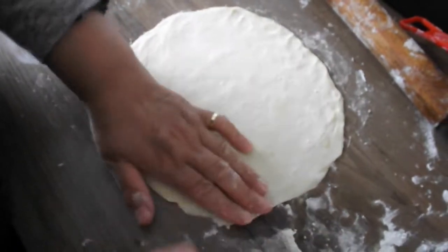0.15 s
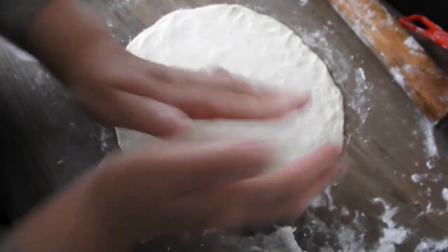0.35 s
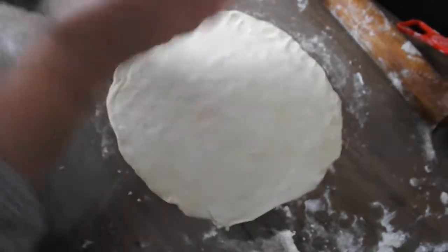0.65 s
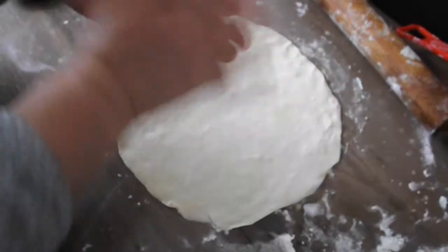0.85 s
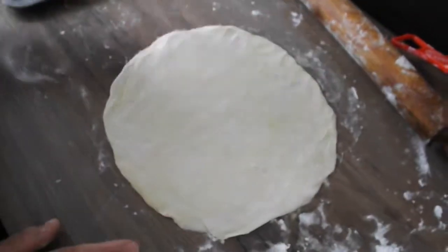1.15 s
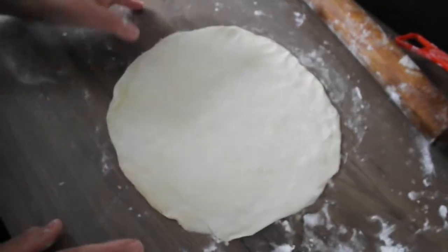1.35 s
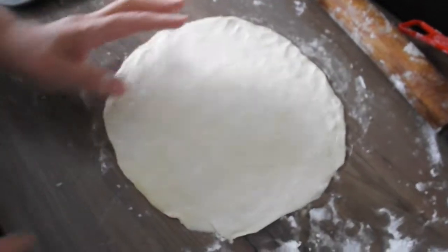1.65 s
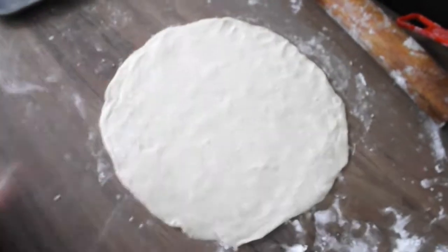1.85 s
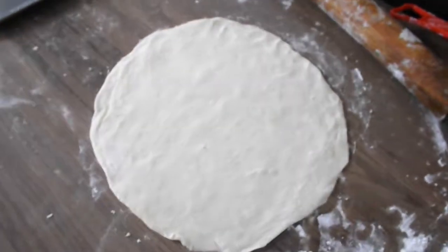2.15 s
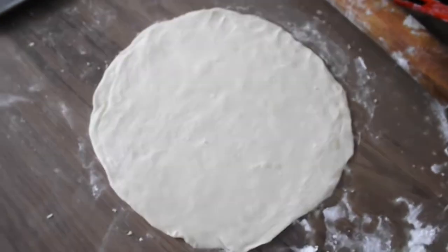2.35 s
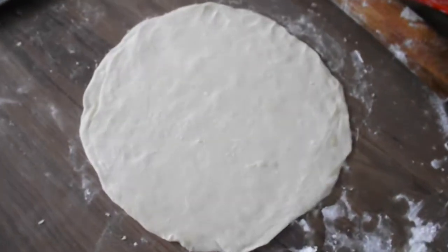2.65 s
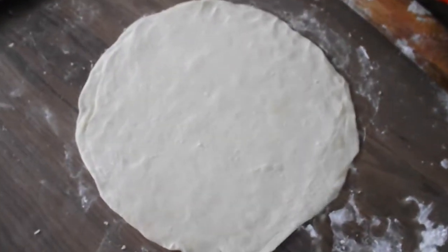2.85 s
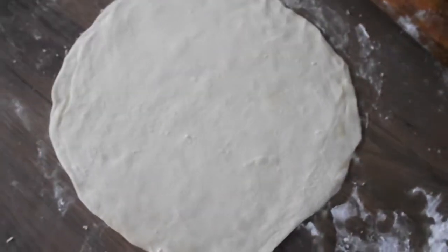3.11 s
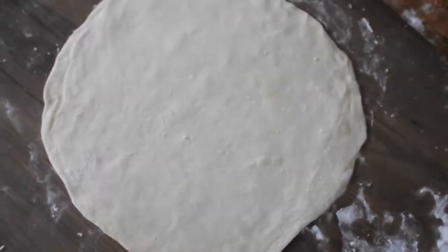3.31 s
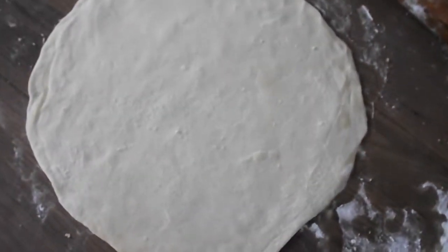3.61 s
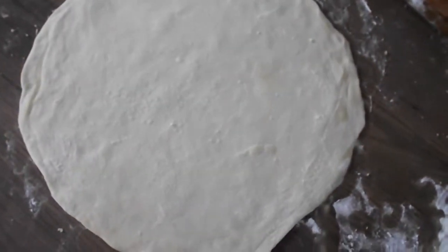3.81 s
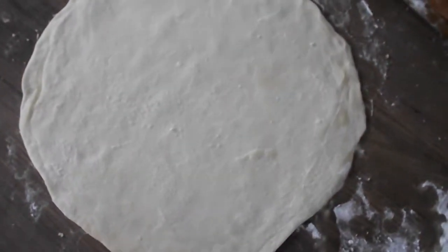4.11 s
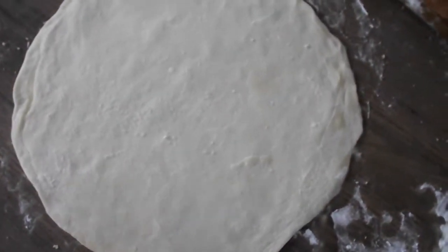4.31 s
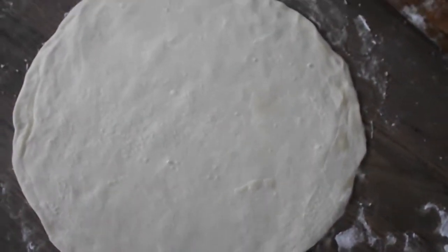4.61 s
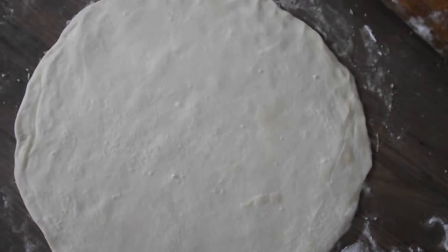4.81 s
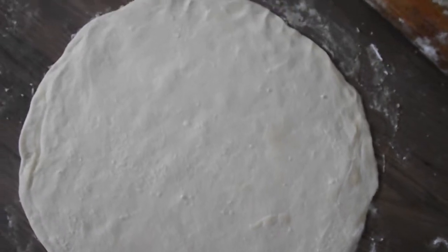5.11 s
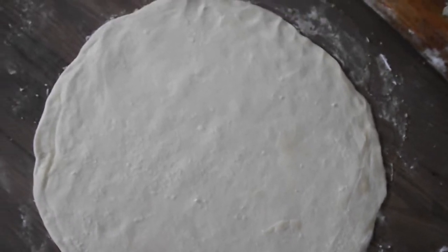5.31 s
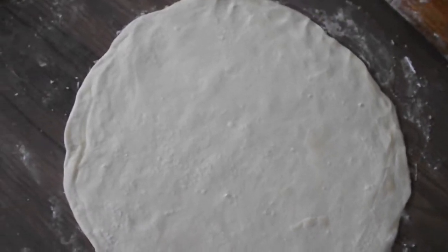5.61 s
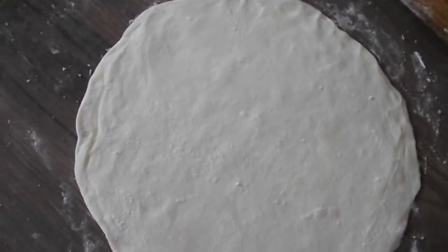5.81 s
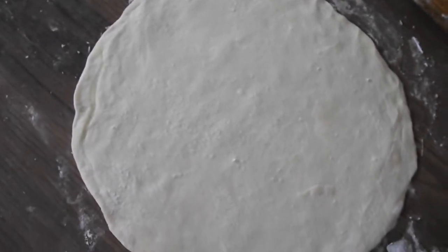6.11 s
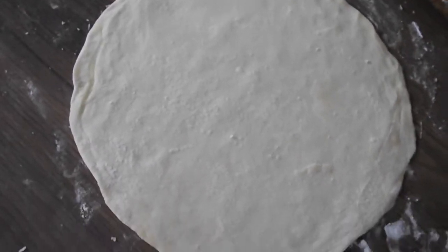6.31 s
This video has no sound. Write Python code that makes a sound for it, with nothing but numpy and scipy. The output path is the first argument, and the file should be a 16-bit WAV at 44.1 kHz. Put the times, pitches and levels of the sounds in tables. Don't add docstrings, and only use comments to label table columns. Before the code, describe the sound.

A palm pats dough once, a low woody thump, then hands rub off flour in a papery swish with a sharp snap. Softer pats, brushes and dull drops follow, with cloth sliding and quiet camera motor knocks. Near the end a very loud crack bounces and scrapes away over low hum. Close small stereo camera, dry kitchen, handling rumble and thin hiss.

```python
import sys
import numpy as np
from scipy import signal
from scipy.fft import rfft, irfft, next_fast_len
from scipy.io import wavfile
from scipy.ndimage import uniform_filter1d

SR = 44100
rng = np.random.default_rng(int(sys.argv[2]) if len(sys.argv) > 2 else 0)


def wav_record(signal):
    frames = np.transpose(np.atleast_2d(signal))
    bounded = np.clip(frames, -1, 1)
    quanta = np.round(bounded * 32767).astype(np.int16)
    wavfile.write(sys.argv[1], SR, quanta)


def attenuation_scalar(level_db):
    decades = np.asarray(level_db, float) / 20
    return 10 ** decades


N = 284884

# start in seconds, peak in dB, board pitch in Hz,
# time to fade by 60 dB in seconds.
PALM_PATS = [
    (0.0376, -6.5, 72.01, 0.2551),
    (1.088, -27.5, 65.22, 0.2063),
    (5.579, -23, 44.27, 0.1262),
]
# start in seconds, peak in dB, pitch in Hz,
# time to fade by 60 dB in seconds.
PITCHED_KNOCKS = [(0.7716, -8, 4800, 0.005), (1.103, -23.5, 140.3, 0.1101), (1.261, -30.5, 2079, 0.01262),
                  (1.2655, -34, 2145, 0.01034), (1.309, -38, 267, 0.2218), (1.499, -27, 279.2, 0.06455),
                  (1.503, -36, 857.2, 0.0437), (1.5075, -36, 674.5, .05), (1.5077, -35.5, 1002, 0.0367),
                  (1.5136, -35, 1250, 0.026), (1.5135, -34, 792.3, 0.0385), (1.513, -30.5, 124.5, 0.15046),
                  (1.525, -36, 697.1, 0.0527), (1.532, -41, 1046, 0.0446), (1.542, -35.5, 625.3, 0.0616),
                  (1.098, -30.5, 242.7, 0.05465), (1.1, -33.5, 328.9, 0.05435), (1.133, -36, 201, 0.0795),
                  (1.135, -41, 306.7, 0.1655), (4.195, -38, 1022, 0.0427), (6.0225, -19, 4674, 0.01049),
                  (6.02, -30, 2050, 0.0578), (6.1417, -27.5, 4461, 0.01402), (2.178, -30.5, 207.5, 0.1795),
                  (2.184, -26, 373.4, 0.10515), (2.19, -32, 547.9, 0.1347), (2.53, -35.5, 202.5, 0.0886),
                  (2.929, -36.5, 138.9, 0.1363), (3.146, -38, 3197, 0.04744), (3.168, -43.5, 3083, 0.07124),
                  (3.485, -30.5, 1251, 0.0415), (3.484, -32, 873.4, 0.01495), (3.483, -28, 490.1, 0.01888),
                  (6.009, -13, 3028, 0.0188), (6.008, -19, 292.4, 0.03637), (6.011, -32, 675.8, 0.4414)]
# start in seconds, peak in dB, bright layer in dB above the peak,
# dull layer in dB above the peak, fade of the spray by 60 dB in seconds.
DRY_TICKS = [(.042, -21.5, -14.5, -2.5, 0.059), (0.7713, -12, -16, -3, 0.01718),
             (0.77158, -15, -12, -20, .01), (.77205, -15, -25.5, -25, 0.01027),
             (.7728, -17.5, -11, -27.5, 0.0104), (.7765, -19, -20, -26.5, 0.0299),
             (1.0975, -27, -20, -13, 0.1), (1.2124, -43, 14, -14.5, 0.0275),
             (1.2139, -36.5, 3, -26, 0.01906), (1.225, -35, -2.5, -16, 0.00603),
             (1.23, -38, 0.5, -14.5, 0.00606), (1.2615, -42, -16.5, -17.5, 0.00782),
             (1.266, -31, -5.5, -18.5, 0.01162), (1.3105, -30, -10, -2, 0.01755),
             (1.3211, -29, -14.5, -2, 0.01129), (1.4993, -36, -16, 6, 0.0505), (1.5035, -40, -15, 8, .03),
             (1.5095, -38, -15, 8, .03), (1.5143, -38, -15, 8, .04), (1.526, -40, -15, 7, .04),
             (1.7933, -20.5, -18.5, -10.5, 0.01184), (1.7963, -19.5, -20, -14, 0.0224),
             (1.8008, -19.5, -13.5, -12.5, 0.0457), (3.029, -20.5, -26.5, -18.5, 0.01518),
             (3.077, -24, -10.5, -19, 0.00911), (3.797, -30, -9, -22.5, 0.06),
             (5.042, -18.5, -17, -15.5, 0.049), (5.254, -32, -5.5, -16.5, 0.0422),
             (5.59, -16, -34.5, -22, 0.03585), (6.0089, 2.0, -12, -26, 0.01717),
             (6.0572, -14, -31, -6, 0.01253)]
TICK_BOUNCES = [(6.014, -6.5, -26, -36, 0.00465), (6.0168, -3.5, -32, -30.5, 0.02473),
                (6.0226, -7.5, -29.5, -16, 0.038), (6.029, -12.5, -27, -26, 0.0156),
                (6.0385, -18.5, -25, -20.5, 0.01457), (6.0885, -15.5, -24, -20, 0.01488),
                (6.094, -20.5, -24.5, -18.5, 0.01008), (6.1004, -23, -25, -20.5, 0.01454),
                (6.12, -19, -15, -19, 0.01456), (6.143, -17, -21, -19.5, 0.01465),
                (6.151, -18.5, -25.5, -18.5, 0.01468), (6.163, -23.5, -25, -20, 0.0192),
                (6.179, -23, -24, -18.5, 0.0212)]
# peak in seconds, level in dB, rise in seconds per 20 dB,
# fall in seconds per 20 dB, fine fizz in dB above the level.
PALM_DUSTING = [(0.329, -43.5, -0.1956, 0.5649, -15.5), (.365, -34, 0.0308, 0.0097, -7.5),
                (.445, -26, 0.0465, 0.0805, -9.5), (0.483, -16, 0.0511, 0.0376, -15.5),
                (0.526, -19, 0.0293, 0.0525, -14), (.57, -34, 0.0354, 0.0704, -12),
                (.505, -24, .05, .05, -12), (0.763, -31, 0.004, 0.06, -6), (0.81, -35, 0.0882, 0.0549, -12),
                (0.841, -38, 0.0615, 0.0488, -9)]
# peak in seconds, level in dB, rise in seconds per 20 dB,
# fall in seconds per 20 dB, coarse grit in dB above the level.
QUICK_BRUSHES = [(0.77, -30, 0.02, 0.04, -9), (.925, -41, .03, .05, -12), (1.106, -32, 0.02, 0.06, -11),
                 (1.25, -38.5, -0.03, 0.1817, -12), (1.31, -40, 0.0311, 0.0915, -5.5),
                 (1.804, -32, 0.064, 0.1022, -10.5), (2.184, -26, 0.0383, 0.0725, -13),
                 (2.29, -38.5, 0.5465, 0.1218, -12), (2.52, -27, 0.0141, 0.0629, -19),
                 (2.775, -37.5, 0.025, 0.04, -16), (2.937, -37.5, 0.04, 0.2185, -18),
                 (3.035, -30.5, -0.0182, 0.1426, -15.5), (3.077, -27, 0.0704, 0.0657, -15.5),
                 (3.15, -33, 0.015, 0.04, -18), (3.21, -42, .06, .06, -15), (2.745, -41, .03, .04, -17),
                 (2.865, -44, .04, .04, -17), (3.36, -40, 0.0245, 0.2048, -15),
                 (3.557, -32.5, 0.0794, 0.1823, -13.5), (4.05, -27, 0.055, 0.08, -11),
                 (4.115, -35, .05, .1, -11), (4.29, -32, 0.0007, 0.2204, -8.5),
                 (4.48, -26.5, -0.4027, 0.2193, -15), (5.048, -38.5, 0.1733, 0.1017, -11),
                 (5.289, -38, 0.1508, 0.1094, -17), (5.597, -22, 0.0248, 0.0896, -15.5),
                 (5.75, -34, 0.2224, 0.09, -11.5), (5.85, -38.5, -0.2038, 0.2681, -10.5),
                 (6.46, -35, 0.2909, -0.58, -9.5)]
# start in seconds, end in seconds, level at start in dB,
# level at end in dB, coarse grit in dB above the level.
CLOTH_SLIDES = [(0.098, 0.229, -46, -52.5, -11.5), (2.185, 2.202, -32, -32.5, -12),
                (0.915, 1.182, -42, -50, -13.5), (1.368, 1.737, -44.5, -40, -12),
                (1.878, 2.16, -36.5, -41, -14), (2.387, 2.494, -41.5, -39.5, -17.5),
                (2.601, 2.731, -44, -50.5, -16.5), (2.826, 2.896, -52, -56, -14.5),
                (3.204, 3.247, -47, -49, -11), (3.399, 3.502, -51.5, -54.5, -15),
                (3.86, 3.941, -44.5, -52.5, -12), (3.64, 3.807, -41.5, -38.5, -9),
                (3.963, 4.189, -43, -52, -15), (4.226, 4.792, -33.5, -30.5, -12),
                (4.857, 4.985, -41.5, -43.5, -10), (5.065, 5.157, -33, -36, -13),
                (5.411, 5.551, -41, -36, -10.5), (5.678, 6.013, -41.5, -35, -11),
                (6.336, 6.46, -40, -41, -18.5)]
# peak in seconds, level in dB, rise in seconds per 20 dB,
# fall in seconds per 20 dB.
BOARD_SCUFFS = [(.002, -37.5, 1.2184, -0.1039), (.07, -47, -0.2282, 0.7544), (.762, -51.5, -0.1018, 0.1762),
                (.95, -46, 0.2807, 0.0143), (1.11, -38, -0.0393, -0.0987), (1.315, -48, -0.4739, -0.7413),
                (1.62, -51.5, 0.1769, 1.0945), (1.8, -54, -0.3015, 1.48), (2.181, -31, 0.0186, 0.0529),
                (2.199, -35.5, 0.0274, 0.1172), (2.3, -56, 0.1734, 0.2373), (2.52, -41, 0.0487, 0.1466),
                (2.935, -50.5, 0.0449, 0.9868), (3.035, -46, 0.0044, 0.0627),
                (3.079, -38.5, 0.0647, 0.1321), (3.375, -48.5, 0.2216, 0.2762),
                (3.56, -45.5, 0.047, 0.1581), (3.82, -49.5, 0.9171, -0.504), (4.05, -50.5, -0.7915, 0.7188),
                (5.05, -45.5, 0.0505, 1.0114), (5.59, -47, 0.3719, 0.4592), (5.75, -52, 0.0733, 1.0133),
                (5.92, -47.5, 0.4174, 0.5593), (6.4, -47.5, 0.0829, -3.5)]
# peak in seconds, level in dB, fall in seconds per 20 dB.
DOUGH_THUDS = [
    (1.311, -46, -0.0147),
    (1.5, -32, 0.0966),
    (1.511, -31, .09),
    (1.527, -35, .08),
    (1.795, -40.5, 0.0675),
    (2.155, -39.5, -0.0379),
    (3.484, -39.5, 0.0726),
]
# time in seconds, pressure in dB.
SCRAPE_PRESSURE = [(6.008, -78), (6.0095, -21.5), (6.035, -23.5), (6.07, -26), (6.106, -25), (6.146, -26.5),
                   (6.185, -36.5), (6.21, -41.5), (6.3, -55.5)]
# start in seconds, knock in dB, ring in dB.
LENS_STEPS = [
    (4.192, -33, -39.5),
    (4.299, -33, -40),
    (4.391, -33.5, -39),
    (4.938, -33, -39),
    (5.045, -31.5, -39),
    (5.135, -32.5, -38.5),
    (5.248, -34, -38),
]
# start in seconds, end in seconds, level at start in dB, level at end in dB.
APPLIANCE_RUNS = [
    (4.745, 4.991, -40, -42.5),
    (5.715, 6.462, -35.5, -35),
]
# time in seconds, rumble in dB.
HAND_RUMBLE = [(0.0, -32.5), (0.94, -43.5), (1.11, -33), (1.64, -46.5), (1.82, -34.5), (2.47, -48),
               (2.52, -39), (2.84, -46), (3.06, -35), (3.15, -56), (3.22, -40), (4.95, -39.5),
               (4.98, -50.5), (5.29, -34), (5.58, -43), (6.46, -35.5)]
# pitch in Hz, width in Hz, level in dB.
SHELL_RINGS = [(315.88, 26.46, -8), (645.04, 24.48, -1.5), (1249.1, 92.46, -2.5), (1501.1, 29.35, -4),
               (2050.2, 24, -5)]

# frequency in Hz, level in dB per Hz.
SKIN_COLOUR = [(1700, -25.5), (2600, -4.5), (3200, -1), (4200, -2.5), (5500, -11), (8000, -19.5)]
FIZZ_COLOUR = [(3400, -30), (4600, -0.5), (6000, -1), (9000, -0.5), (12000, 0.5), (14500, -2.5),
               (16000, -1)]
GRIT_COLOUR = [(600, -14.5), (1100, -5), (1800, -0.5), (2500, 0.5), (3200, -33.5)]
SCUFF_COLOUR = [(50, -3), (130, 4), (350, 3), (700, -4), (1050, -6.5), (1700, -20)]
WOOD_COLOUR = [(60, -4), (130, 1), (330, -0.5), (500, -5), (800, -0.5), (1300, -5.5), (2000, -15)]
AIR_COLOUR = [(25, 9.5), (50, -2), (100, 6), (300, -4.5), (1000, -8.5), (3200, -14.5), (5500, -15),
              (16000, 2.5)]
HISS_COLOUR = [(300, -28), (2000, -42.5), (8000, 8.5), (12000, 7.5), (14800, -3.2442), (16000, 3)]


def pats():
    out = np.zeros(N)
    t = np.arange(SR // 2) / SR
    overtones = (1.07, -17, 2.9), (1.55, -15, 1.3), (2.5, -26.5, 0.8796), (4.3, -22.5, 0.475)
    rise = 1 - np.exp(-(t / 0.004372) ** 2)
    for s, db, hz, t60 in PALM_PATS:
        resting_palm = np.exp(-(t / (0.343 * t60)) ** 6)
        damped = attenuation_scalar(-60 * t / (0.9934 * t60)) * resting_palm
        add(out, s, attenuation_scalar(db) * rise * damped * np.sin(2 * np.pi * hz * t))
        for ratio, rel_db, life in overtones:
            fade = attenuation_scalar(db + rel_db - 60 * t / (t60 * life))
            add(out, s, fade * rise * np.sin(2 * np.pi * hz * ratio * t))
    return out


def knocks():
    out = np.zeros(N)
    t = np.arange(SR // 2) / SR
    for s, db, hz, t60 in PITCHED_KNOCKS:
        rise = 1 - np.exp(-t * hz / 0.8023)
        add(out, s, attenuation_scalar(db - 60 * t / t60) * rise * np.sin(2 * np.pi * hz * t))
    return out


def ticks():
    layers = np.zeros((3, N))
    t = np.arange(6000) / SR
    click = np.exp(-t / .00005)
    sprays = rng.standard_normal((60, 6000))
    for (s, db, bright_db, dull_db, tail), spray in zip(DRY_TICKS + TICK_BOUNCES, sprays):
        snap = click + 0.12958 * spray * attenuation_scalar(-60 * t / abs(tail))
        for layer, rel_db in zip(layers, (0, bright_db, dull_db)):
            add(layer, s, attenuation_scalar(db + rel_db) * snap)
    bright = [(3500, -24.5), (5000, 0.5), (9000, 2.5), (14000, 7), (16000, 3)]
    dull = [(100, -31.5), (300, -3.5), (1800, -6.5), (3000, -24.0)]
    out = np.zeros(N)
    for layer, colour in zip(layers, (SKIN_COLOUR, bright, dull)):
        peak = abs(port(coloured(click, colour))).max()
        out += coloured(layer, colour) / peak
    return out


def rubbing():
    rub, fine, coarse, dull, wooden = touches()
    clumps_db = .8 * rng.exponential(1, N) + 1.2 * drift(size=90) + .6 * drift(size=500)
    slips = rng.standard_normal((4, N)) * attenuation_scalar(clumps_db)
    skin = rub * attenuation_scalar(-0.9622) * heard(coloured(slips[0], SKIN_COLOUR))
    fizz = fine * attenuation_scalar(2.5) * heard(coloured(slips[1], FIZZ_COLOUR))
    grit = coarse * attenuation_scalar(0.2134) * heard(shell(coloured(slips[2], GRIT_COLOUR), mix_db=-19.5))
    scuff = dull * attenuation_scalar(-2.0272) * heard(shell(coloured(slips[3], SCUFF_COLOUR), mix_db=0.0))
    wood = wooden * heard(shell(coloured(slips[3][::-1], WOOD_COLOUR), mix_db=5.0))
    return skin + fizz + grit + wood + scuff


def touches():
    def mixed(power, fizz_db, grit_db):
        return power * attenuation_scalar(2 * np.array([0, fizz_db, grit_db]))[:, None]

    power = 0
    hold = 0.006278
    for s, db, up, down, fizz_db in PALM_DUSTING:
        power = power + mixed(held(s - hold, s + hold, db, db, up, down), fizz_db, grit_db=-25.5)
    hold = 0.004733
    for s, db, up, down, grit_db in QUICK_BRUSHES:
        fizz_db = -20 - 0.2504 * (db + 37.5)
        power += mixed(held(s - hold, s + hold, db, db, up, down), fizz_db, grit_db)
    edge = 0.07615
    for start, end, from_db, to_db, grit_db in CLOTH_SLIDES:
        fizz_db = -20.5 - 0.0432 * (to_db + 35)
        power += mixed(held(start, end, from_db, to_db, edge, edge), fizz_db, grit_db)

    step_scuffs = [(s, db - 10, 0.01174, 0.0482) for s, db, _ in LENS_STEPS]
    dull = sum(held(s, s, db, db, up, down) for s, db, up, down in BOARD_SCUFFS + step_scuffs)
    thuds = sum(held(s, s, db, db, .003, down) for s, db, down in DOUGH_THUDS)
    scrape = attenuation_scalar(columns(SCRAPE_PRESSURE)[0] + np.array([[0], [-20], [-9.5], [-5]]))
    rub, fine, coarse = np.hypot([spread(p) for p in power], scrape[:3])
    return rub, fine, coarse, spread(dull), np.hypot(scrape[3], spread(thuds))


def lens_motor():
    out = np.zeros(N)
    t = np.arange(8000) / SR
    bend = 0.000956 * np.exp(-t / 0.004052)
    knock = (t / 0.008151) * np.exp(1 - t / 0.00647) * np.sin(2 * np.pi * 297.27 * (t + bend))
    edge = attenuation_scalar(-9.0) * np.exp(-t / 0.003636) * np.sin(2 * np.pi * 469.8 * t)
    tail = attenuation_scalar(-13 - 60 * t / 0.2061) * (1 - np.exp(-(t / 0.0141) ** 2)) * np.sin(2 * np.pi * 305 * t)
    chances = rng.uniform(-0.923, 1, (len(LENS_STEPS), 3))
    for (s, knock_db, ring_db), (late, wide, sharp) in zip(LENS_STEPS, chances):
        width = 0.005806 + 0.001263 * wide
        swell = np.exp(-((t - .013 - 0.00111 * late) / width) ** 2)
        hz = 1226.9 * (1 + 0.01472 * sharp + 0.5386 * (t - .013))
        ring = swell * np.sin(2 * np.pi * hz * t)
        add(out, s - .004, attenuation_scalar(knock_db + 1.0) * (knock + tail + edge) + attenuation_scalar(ring_db + 4) * ring)
    return out


def kitchen():
    air = heard(shell(coloured(rng.standard_normal(N), AIR_COLOUR), mix_db=-0.5))
    air = attenuation_scalar(-47 + 1.1454 * drift(size=3000)) * air

    turns = np.cumsum(51.945 * (1 + 0.012801 * drift(size=4000))) / SR
    edge = 0.1044
    strength = spread(sum(held(*run, edge, edge) for run in APPLIANCE_RUNS))
    hum = strength * attenuation_scalar(0.668 * drift(size=2000)) * np.sin(2 * np.pi * turns)

    shake = [(5, -3.5), (12, 9.0), (21, 2.0), (28, -11.5), (60, -9.5), (120, -31.5), (300, -55)]
    rumble = evened(coloured(rng.standard_normal(N), shake))
    return air + hum + attenuation_scalar(columns(HAND_RUMBLE)[0] + 1.5) * rumble


def walls(x):
    t = np.arange(SR // 3) / SR
    signs = rng.choice([-1., 1.], (3, len(t)))
    present = rng.random((3, len(t))) < 2500 / SR
    taps = signs * present * attenuation_scalar(-60 * t / 0.1254) * (t > .002)
    apart = coloured(taps[1:], [(500, -44.5), (3000, -2.0), (7000, -3.0), (14000, -13.5)])
    heard_taps = (taps[0] + apart) / np.linalg.norm(taps[0])
    return signal.fftconvolve(x[None], heard_taps, axes=1)[:, :N]


def shell(x, mix_db):
    def response(hz):
        return 1 + sum(attenuation_scalar(db + mix_db) / (1 + 2j * (hz - f) / width) for f, width, db in SHELL_RINGS)
    return through(x, response)


def port(x):
    port_hz, sharpness = 3236.3, 7.7243
    return through(x, lambda hz: 1 / (1 - (hz / port_hz) ** 2 + 1j * hz / port_hz / sharpness))


def heard(x):
    return x / np.sqrt(np.mean(port(x) ** 2))


def evened(x):
    return x / np.sqrt(np.mean(x ** 2) + 1e-20)


def through(x, response):
    size = next_fast_len(x.shape[-1], True)
    spectrum = rfft(x, size) * response(np.fft.rfftfreq(size, 1 / SR))
    return irfft(spectrum, size)[..., :x.shape[-1]]


def coloured(x, points):
    f, db = np.transpose(points)
    return through(x, lambda hz: attenuation_scalar(np.interp(np.log(hz + 1), np.log(f), db)))


def drift(size):
    return evened(uniform_filter1d(uniform_filter1d(rng.standard_normal(N), size), size))


def columns(rows):
    s, *values = np.transpose(rows)
    return [np.interp(np.arange(N) / SR, s, v) for v in values]


def held(start, end, from_db, to_db, rise, fall):
    t = np.arange(0, N / SR + .001, .001)
    before, after = np.maximum(start - t, 0), np.maximum(t - end, 0)
    edges_db = 20 * (before / abs(rise) + after / abs(fall))
    level_db = np.interp(t, [start, end + 1e-6], [from_db, to_db])
    return attenuation_scalar(2 * (level_db - edges_db))


def spread(power):
    return np.interp(np.arange(N) / SR, np.arange(len(power)) / 1000, np.sqrt(power))


def add(mix, s, sound):
    part = mix[round(s * SR):][:len(sound)]
    part += sound[:len(part)]


def scene():
    bright = rubbing() + ticks()
    near = bright + pats() + knocks() + lens_motor() + kitchen()
    both = near + attenuation_scalar(-11.0) * walls(bright)
    late = through(both[0], lambda hz: np.exp(-2j * np.pi * hz / SR))
    return np.array([late, both[1]])


def low_pass(x):
    return signal.sosfilt(signal.butter(12, 16270, fs=SR, output="sos"), x)


def record(dry):
    hiss = evened(coloured(rng.standard_normal((2, N)), HISS_COLOUR))
    x = port(dry) + attenuation_scalar(-71.5) * hiss
    side = coloured((x[0] - x[1]) / 2, [(60, -43.5), (200, -23.0), (450, -4), (900, -4.5), (8000, 0.5)])
    x = np.clip(x.mean(0) + np.array([side, -side]), -1, 1)
    x = coloured(x, [(20, 0), (15750, 0), (15850, -60)])
    return low_pass(x)


dry = scene()
out = record(dry)
wav_record(out)
```